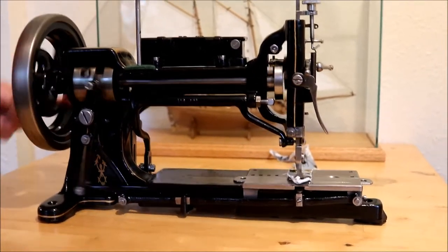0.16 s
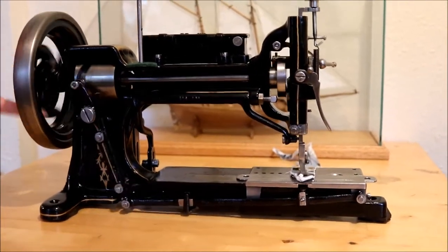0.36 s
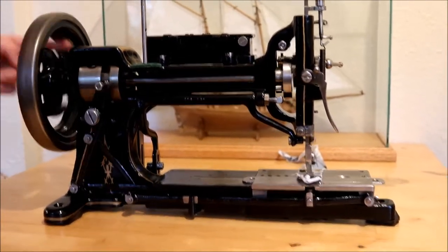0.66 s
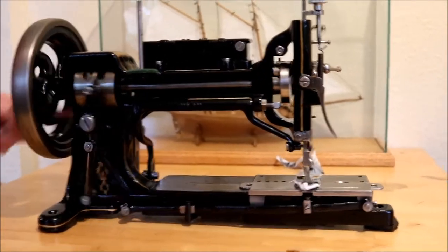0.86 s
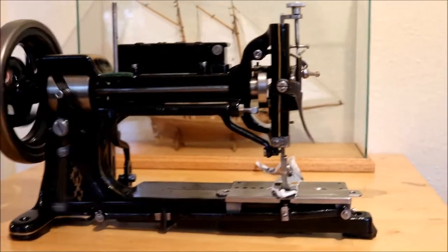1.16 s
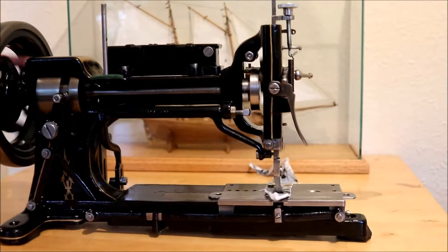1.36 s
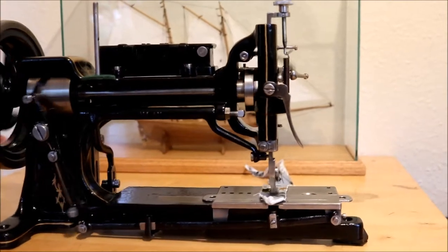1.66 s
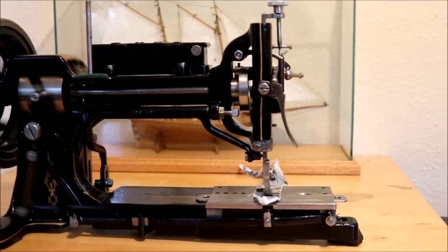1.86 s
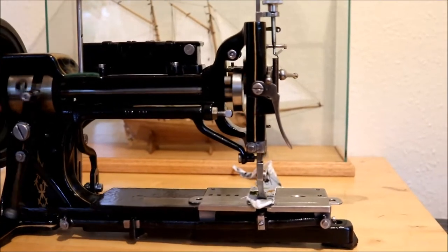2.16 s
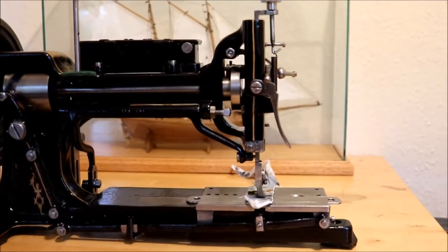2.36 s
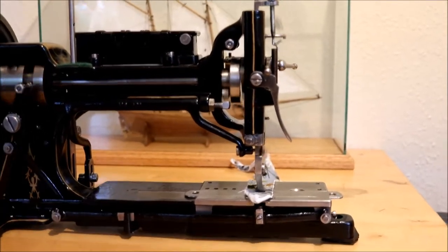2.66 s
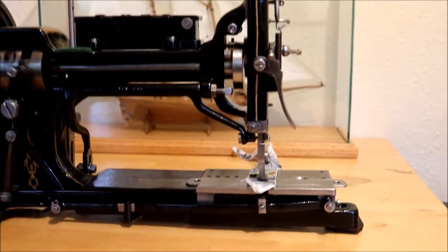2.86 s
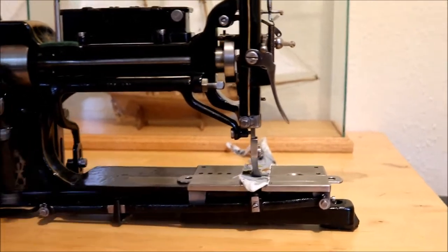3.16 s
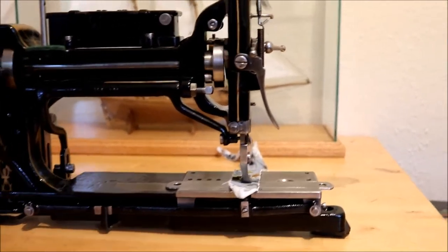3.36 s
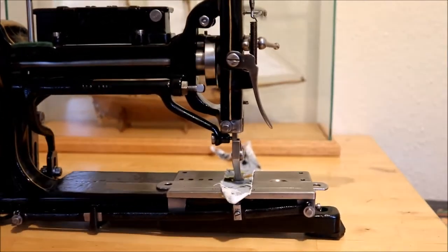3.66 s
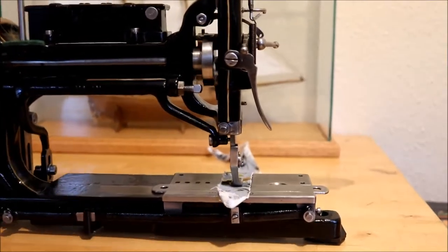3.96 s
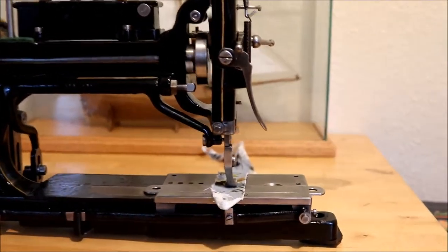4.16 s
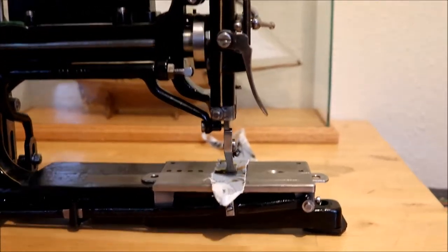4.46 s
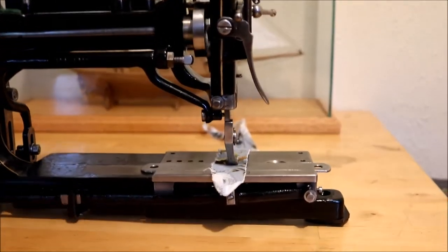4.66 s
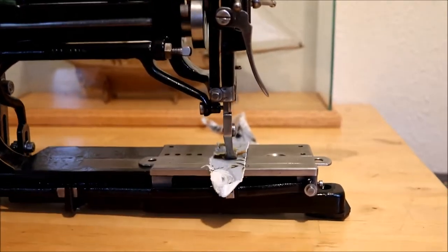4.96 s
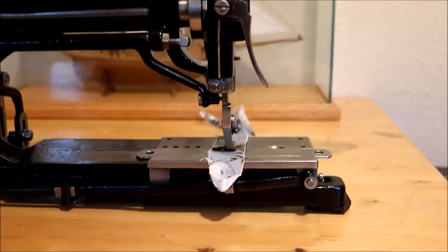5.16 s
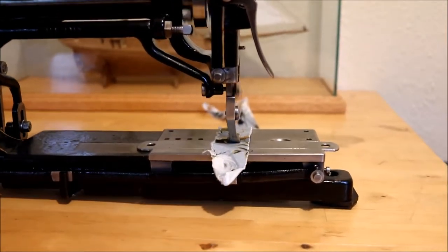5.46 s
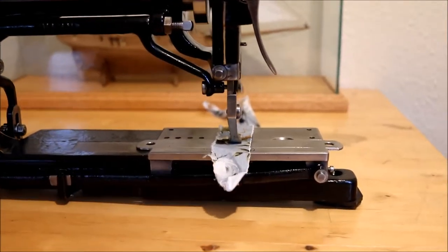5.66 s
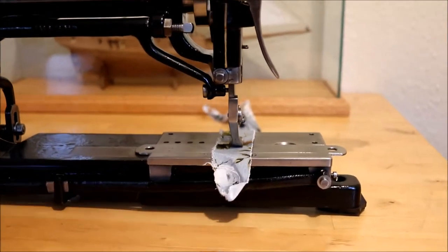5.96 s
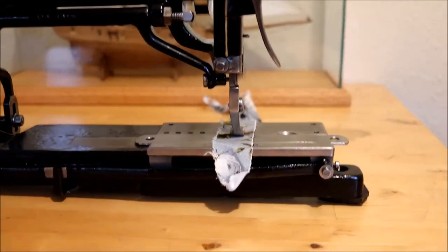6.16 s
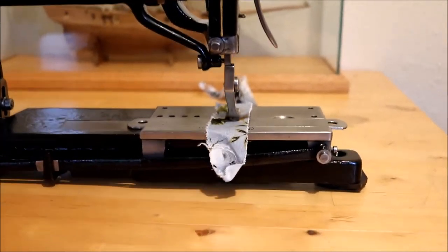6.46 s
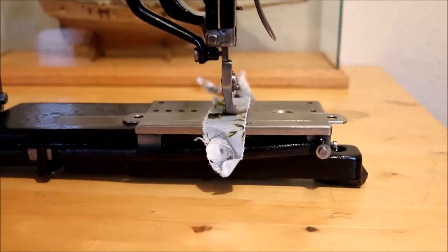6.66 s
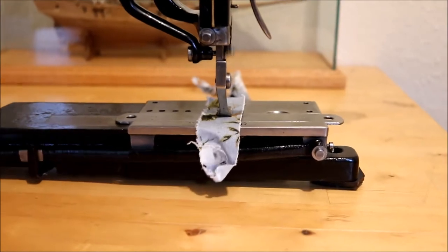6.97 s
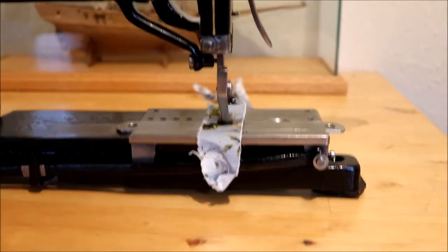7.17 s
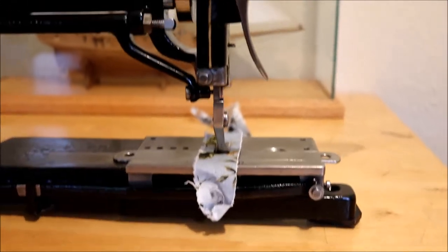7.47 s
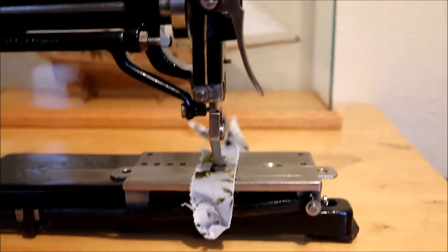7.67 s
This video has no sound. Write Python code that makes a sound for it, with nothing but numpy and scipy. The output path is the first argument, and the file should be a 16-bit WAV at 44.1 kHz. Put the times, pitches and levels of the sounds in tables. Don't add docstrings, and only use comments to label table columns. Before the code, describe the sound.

Hand-turned antique sewing machine clatters evenly on a wooden table, each turn a click, ping, double clack and hard clack over low rumble.

```python
import sys
import numpy as np
from scipy import signal
from scipy.fft import rfft, irfft
from scipy.io import wavfile
from scipy.ndimage import uniform_filter1d, map_coordinates

SR = 44100
rng = np.random.default_rng(int(sys.argv[2]) if len(sys.argv) > 2 else 0)


def pcm_store(signal):
    levels = np.round(np.clip(np.atleast_2d(signal), -1, 1) * 32767)
    wavfile.write(sys.argv[1], SR, levels.astype(np.int16).T)


def level_to_linear(level):
    exponent = np.asarray(level, float) / 20
    return 10 ** exponent


N = 343980

# (lever [s], spring [s], latch [s], feed [s], shuttle [s])
TURNS = [(0.0764, 0.1354, 0.279, 0.2918, 0.4484), (0.7651, 0.8233, 0.9594, 0.9726, 1.1242),
         (1.4388, 1.474, 1.6107, 1.6222, 1.7753), (2.0838, 2.141, 2.2758, 2.2886, 2.4413),
         (2.7577, 2.817, 2.9562, 2.9685, 3.1281), (3.462, 3.5222, 3.6711, 3.6814, 3.8537),
         (4.1982, 4.258, 4.4045, 4.4186, 4.5744), (4.8957, 4.9516, 5.089, 5.1017, 5.2489),
         (5.5572, 5.6126, 5.7483, 5.7604, 5.912), (6.2244, 6.2785, 6.4157, 6.4275, 6.5779),
         (6.8831, 6.9362, 7.069, 7.0799, 7.2258), (7.5235, 7.5757, 7.7025, 7.7129, 7.858)]
# (time [s], level [dB])
HAND = [(0, -1), (.6, 1), (1.2, -0.5), (1.8, 0.5), (2.4, 0.5), (3, 0.5), (3.5, 0), (4.1, -0.5), (4.6, 2.5),
        (5.1, 2), (5.6, 4), (6.2, 3.5), (6.7, 2.5), (7.2, 5), (7.8, 3.5)]
# (frequency [Hz], width [Hz], level [dB])
CASTING = [(469, 22, -4.5), (683.4, 79, 1.5), (824.3, 43, 4), (893, 50, -1), (1296, 165, -8.5)]
# (frequency [Hz], level [dB per Hz])
FRAME = [(530, -1.5), (900, -18), (968, -1.5), (1610, -4.5), (2590, 0), (3150, -4), (4330, -2),
         (6310, -7.5), (13700, -13), (15500, -13.5), (16500, -49)]


def unit(x):
    return x / np.sqrt(np.mean(x ** 2))


def colour(x, points, share=0.91):
    hz, db = np.transpose(points)
    f = np.maximum(np.arange(N // 2 + 1) * SR / N, 1)
    gain_db = share * np.interp(np.log(f), np.log(hz), db)
    return irfft(rfft(x) * level_to_linear(gain_db), N)


def mode(x, hz, t60):
    r, w = np.exp(-np.log(1000) / (t60 * SR)), 2 * np.pi * hz / SR
    return signal.lfilter([0, np.sin(w)], [1, -2 * r * np.cos(w), r * r], x)


def ring(x, peaks):
    total = 0
    for k, (hz, width, db) in enumerate(peaks):
        t60 = np.log(1000) / np.pi / width
        total = total + (-1) ** k * level_to_linear(db) * width / 1000 * mode(x, hz, t60)
    return total


def fade(bare, t60):
    return signal.lfilter([1], [1, -np.exp(-np.log(1000) / (t60 * SR))], bare)


def stereo_noise(alike_hz):
    mid, side = rng.standard_normal((2, N))
    side = signal.lfilter(*signal.butter(1, alike_hz, "high", fs=SR), side)
    return np.array([mid + side, mid - side])


def grainy(x, grain_db, size):
    jumps = np.minimum(rng.exponential(size=N // size + 1), 3)
    return x * level_to_linear(grain_db * np.repeat(jumps, size)[:N])


def even(force):
    spectrum = rfft(force)
    size = abs(spectrum)
    return irfft(spectrum * (size.mean() / (size + 1e-9)) ** .75, len(force))


def blows(table, peaks, rise_ms, chatter_ms, vary, crack=0.):
    burst, length = 600, 3000
    ms = np.arange(burst) * 1000 / SR
    shape = (1 - np.exp(-ms / rise_ms)) * np.exp(-ms / chatter_ms)
    onset = np.minimum(shape / shape.max() * 8, 1)
    habit, change = rng.laplace(size=burst), rng.laplace(size=(len(table), burst))
    usual_peak = abs(ring(even(shape * habit), peaks)).max() * np.hypot(1, vary)
    sound, bare = np.zeros((2, N + length)), np.zeros(N)
    for (time, db, left_db), fresh in zip(table, change):
        force = even(shape * (habit + vary * fresh)) * onset
        force = np.r_[force, np.zeros(length - burst)]
        hit = ring(force, peaks) / usual_peak + crack * np.diff(force, prepend=0)
        i = int(time * SR)
        sound[:, i:i + length] += hit * level_to_linear(db + np.array([[left_db], [-left_db]]) / 2)
        bare[i] = level_to_linear(db)
    return sound[:, :N], bare


def side_blows(table, late_s, db):
    return [(row[0] + late_s, row[1] + db, row[2]) for row in table]


def light(sound):
    return signal.sosfilt(signal.butter(2, 2260, "high", fs=SR, output="sos"), sound)


def turn_marks():
    return np.array(TURNS)[:, [0, 2, 4]].ravel()


def place_time(place):
    marks = turn_marks()
    return np.interp(place + 3 * np.arange(len(TURNS)), np.arange(len(marks)), marks, right=N)


def part_rows(times, part, extra_db=0, stray=()):
    db, nearer, pan, turning, share = part
    peak = db + nearer * times + share * np.interp(times, *np.transpose(HAND)) + extra_db
    heard = [row for row in zip(times, peak, pan + turning * times) if row[0] < N / SR]
    return sorted(heard + list(stray))


def turn_blows():
    firm_db = [-1.5, .3, 0, .5, .5, -0.5, -0.2, .5, 0, -0.1, -0.5, -1.5]
    # (lead before latch [ms], peak there [dB], peak after shuttle [dB])
    play = [(33.6, -52.5, -21), (31, -33, -21.5), (32.4, -38, -27), (32.4, -46, -21.5), (33.2, -28.5, -25),
            (36.4, -45, -23), (34.8, -45, -22), (29.7, -22.5, -22), (31.4, -40, -24), (31.3, -33, -40),
            (27.5, -25.5, -20), (26.3, -35, -25)]
    # (time [s], peak [dB], left minus right [dB])
    stray_slack = [
        (5.8107, -40, -2.5),
        (6.1384, -35, 0),
        (6.699, -38, -7),
        (7.447, -26, 7),
    ]
    # (time [s], peak [dB], left minus right [dB])
    stray_thread = [
        (1.5993, -38, -2),
        (3.559, -51, 0),
        (4.973, -44, 0),
        (5.8122, -40, 1.5),
        (6.1374, -42, 7),
        (6.7768, -34.5, 11),
        (7.142, -46, -1),
        (7.1711, -40, 4),
    ]
    # (peak [dB], gain [dB/s], left minus right [dB], turning [dB/s], share of hand effort)
    lever, spring, latch = (-11.5, 0.21, -2.5, 0.35, 0.36), (-23, 0.04, -1.5, 2.2, -0.1), (-9.5, 0.35, -4, 0.6, 0.12)
    feed, shuttle = (-11.5, 0.26, -5, 1.1, -0.6), (-4, 0.02, -3, 0.5, 0.34)
    slack_early, slack_late = (0, -0.047, -1.5, .15, 0), (-4, 0, -7, 1.8, -0.5)
    pull, lift, settle = (-39.5, -0.33, -1.5, 1, 2), (-61, -0.5, -.5, 1.5, 4), (-55, 1, -.5, 2.7, -0.5)
    quick_db = 1.2, 2.7, 0.79, 0.34, 0.52

    times = np.transpose(TURNS)
    quick = 10 * (0.65 / np.gradient(times[0]) - 1)
    main = [part_rows(s, part, db * quick + firm_db)
            for s, part, db in zip(times, (lever, spring, latch, feed, shuttle), quick_db)]
    lead_ms, early_db, late_db = np.transpose(play)
    late = part_rows(place_time(2.613), slack_late, late_db, stray_slack)
    slack = part_rows(times[2] - lead_ms / 1000, slack_early, early_db, late)
    setting = part_rows(place_time(2.66), settle, stray=stray_thread)
    thread = part_rows(place_time(1.49), pull, stray=setting)
    thread += part_rows(place_time(2.555), lift)
    return main + [slack, thread]


def cam_loads(t):
    # (place in turn, half width [places], table rumble [dB], gear grind [dB], scrape [dB])
    cams = [
        (.28, 0.18, -29.5, -45, -61),
        (.6, .15, -35.5, -51, -60.5),
        (0.901, 0.067, -25.5, -46.5, -50),
        (1.32, 0.15, -22, -37, -51),
        (1.55, 0.16, -22, -37.5, -43),
        (1.86, 0.084, -20.5, -63, -60),
        (2.1, 0.22, -28, -43.5, -60),
        (2.662, 0.15, -29, -47.5, -55.5),
    ]
    idle_db = -38, -49.5, -50
    marks = turn_marks()
    place = np.interp(t, np.r_[-.24, marks], np.arange(-1, len(marks))) % 3
    gain = level_to_linear(idle_db)[:, None]
    for at, width, *db in cams:
        gain = gain + level_to_linear(db)[:, None] * np.exp(-((place - at) / width) ** 2)
    return 20 * np.log10(gain)


def table_top(rumble_db):
    # (frequency [Hz], t60 [s], share of feed blow, share of shuttle blow, share of rumble)
    wood_modes = [(104, .22, -.11, -.19, .22), (122, .25, -.03, .06, .1), (138, .27, .33, .02, .45),
                  (156, .22, -.15, .15, 1.), (231, .11, -.15, .045, .17), (243, .13, .16, .01, .12),
                  (303, .1, .01, -.11, .22), (328, .15, .01, -.03, .15), (387, .3, .01, .005, .06),
                  (505, .17, .014, .005, .05), (690, .1, .02, .01, .05), (815, .12, .02, -.04, .06)]
    latch_s, shuttle_s = np.transpose(TURNS)[2::2]
    feed, shuttle = np.zeros((2, N))
    for train, times, lag_s, db in ((feed, latch_s, .0223, 4.5), (shuttle, shuttle_s, .0091, .1)):
        train[((times[times < N / SR] + lag_s) * SR).astype(int)] = level_to_linear(db)
    shake = level_to_linear(rumble_db - 36) * rng.standard_normal(N)
    wood = sum(mode(a * feed + b * shuttle + c * shake, hz, t60) for hz, t60, a, b, c in wood_modes)
    return wood * level_to_linear([[.4], [-.4]])


def friction(db, peaks, alike_hz, patchy_db):
    patches = np.repeat(rng.standard_normal(N // 1500 + 1), 1500)[:N]
    patches = uniform_filter1d(patches, size=1500)
    rub = grainy(stereo_noise(alike_hz), grain_db=3.5, size=200)
    return level_to_linear(db + patchy_db * patches) * unit(ring(rub, peaks))


def gear_grind(grind_db, effort_db):
    return friction(grind_db + 0.14 * effort_db, CASTING, alike_hz=2650, patchy_db=1.0)


def plate_scrape(scrape_db, effort_db):
    # (frequency [Hz], width [Hz], level [dB])
    plates = [(1449, 77, 6), (1892, 94, 5), (2225, 130, 2), (2900, 250, -3), (4600, 760, -12)]
    return friction(scrape_db + 0.44 * effort_db, plates, alike_hz=2680, patchy_db=1.5)


def room_air():
    # (frequency [Hz], level [dB per Hz])
    air_colour = [(20, -6), (60, 6), (300, -1), (1000, -32), (2500, -20.5), (4000, -26), (9000, -32.5),
                  (15000, -45), (17000, -50)]
    return level_to_linear(-45.5) * unit(colour(stereo_noise(500), air_colour))


def slack_joints(slacks, levers, feeds, shuttles):
    # (frequency [Hz], width [Hz], level [dB])
    slack_ring = [(1440, 270, 9.5), (1960, 180, 11.5), (2650, 660, 5.5), (4580, 4400, -13.5)]
    knocks = slacks + side_blows(levers, 0.015, db=-22) + side_blows(levers, -0.0052, db=-23)
    knocks += side_blows(shuttles, 0.031, db=-27.5) + side_blows(feeds, .025, db=-14.0)
    knocks += side_blows(shuttles, 0.076, db=-34.0)
    return blows(knocks, slack_ring, rise_ms=0.15, chatter_ms=1.4, vary=4.8)


def thread_ticks(threads, levers):
    # (frequency [Hz], width [Hz], level [dB])
    thread_ring = [(4500, 800, -2.5), (7000, 300, 5), (12300, 1300, -4.5)]
    ticks = threads + side_blows(levers, -0.00087, db=-28)
    return blows(ticks, thread_ring, rise_ms=.2, chatter_ms=0.67, vary=3.7, crack=0.062)


def take_up_lever(levers):
    # (frequency [Hz], width [Hz], level [dB])
    lever_ring = [(2945, 136, 7), (4063, 224, 7.5), (4497, 195, 5), (5690, 290, -3), (6400, 660, -6),
                  (8860, 430, -4.5), (10260, 370, -8.5), (12100, 1400, -10), (14500, 690, -2)]
    # (frequency [Hz], width [Hz], level [dB])
    lever_tail = [(2890, 30, -12), (4660, 60, -15), (14170, 150, -6)]
    sound, bare = blows(levers, lever_ring + lever_tail, rise_ms=3.5, chatter_ms=1.5, vary=0.3, crack=0.06)
    return light(sound), bare


def spring_ping(springs):
    # (frequency [Hz], width [Hz], level [dB])
    spring_ring = [(7380, 280, 13), (9730, 230, 6.5), (11100, 250, 1), (11400, 250, -7), (13200, 1100, -3)]
    # (frequency [Hz], t60 [s], level under the blow [dB])
    spring_hum = [(7240, .07, -28), (7400, .06, -28), (7870, .05, -33)]
    snaps = springs + side_blows(springs, 0.0068, db=-10)
    sound, bare = blows(snaps, spring_ring, rise_ms=0.25, chatter_ms=0.98, vary=1.0, crack=0.084)
    buzz = bare + 0.1 * fade(bare, 0.15) * grainy(rng.standard_normal(N), grain_db=4.0, size=300)
    hum = sum(level_to_linear(db) * mode(buzz, hz, t60) for hz, t60, db in spring_hum)
    return sound + hum * level_to_linear([[2.5], [-2.5]]), bare


def feed_latch(latches):
    # (frequency [Hz], width [Hz], level [dB])
    latch_ring = [(2920, 380, -11), (4075, 350, 4), (5950, 390, -6), (6700, 650, -22), (8760, 580, -12),
                  (10230, 590, -14.5), (11430, 830, -16.5), (13800, 970, -15)]
    sound, bare = blows(latches, latch_ring, rise_ms=0.076, chatter_ms=1.68, vary=0.9, crack=0.071)
    return light(sound), bare


def feed_drop(feeds):
    # (frequency [Hz], width [Hz], level [dB])
    feed_ring = [(790, 56, -34), (1630, 260, 3.5), (2920, 430, 6), (4450, 250, 6.5), (6160, 520, -2),
                 (7700, 810, -10), (9600, 330, -9), (11760, 680, -14), (14800, 540, -15)]
    drops = feeds + side_blows(feeds, 0.0058, db=-7.5)
    return blows(drops, feed_ring, rise_ms=0.2, chatter_ms=2.0, vary=0.45, crack=0.027)


def casting_knock(feeds, shuttles):
    knocks = side_blows(feeds, 0.00292, db=-12) + side_blows(shuttles, 0.00299, db=-18.0)
    return blows(knocks, CASTING, rise_ms=1.0, chatter_ms=1.03, vary=1.0)[0]


def shuttle_clack(shuttles):
    # (frequency [Hz], width [Hz], level [dB])
    shuttle_ring = [(800, 87, 8.5), (2200, 230, 2.5), (3380, 120, 4.5), (4160, 146, 9), (5520, 1060, 0.5),
                    (6800, 2300, -6), (9290, 850, 0.5), (10280, 750, -2.5), (12200, 1200, -9.5),
                    (14200, 760, -5)]
    clacks = shuttles + side_blows(shuttles, 0.0027, db=-22)
    return blows(clacks, shuttle_ring, rise_ms=0.052, chatter_ms=0.67, vary=0.29, crack=0.073)


def frame_rattle(impulses):
    share_db = -19.5, -14.5, -16.5, -18.0, -17.0, -23.0, -17
    drive = sum(level_to_linear(db) * bare for db, bare in zip(share_db, impulses))
    rise_t60 = 1.64e-3 * np.log(1000)
    grains = unit(colour(grainy(stereo_noise(2500), grain_db=3.5, size=40), FRAME))
    return (fade(drive, 0.056) - fade(drive, rise_t60)) * grains


def room_tail(impulses):
    share_db = -21.5, -30.5, -23, -24.5, -23.0, -63, -14
    drive = sum(level_to_linear(db) * bare for db, bare in zip(share_db, impulses))
    return fade(drive, 0.25) * unit(colour(stereo_noise(1000), FRAME, share=1.13))


def works():
    levers, springs, latches, feeds, shuttles, slacks, threads = turn_blows()
    parts = [take_up_lever(levers), feed_latch(latches), feed_drop(feeds), shuttle_clack(shuttles),
             spring_ping(springs), slack_joints(slacks, levers, feeds, shuttles), thread_ticks(threads, levers)]
    impulses = [bare for _, bare in parts]
    clicks = sum(sound for sound, _ in parts) + casting_knock(feeds, shuttles) + frame_rattle(impulses)
    sheen = signal.lfilter(*signal.butter(1, 7240, "high", fs=SR), clicks)
    sheen_db = 1 + .5 * np.arange(N) / SR
    return clicks + (level_to_linear(sheen_db) - 1) * sheen + room_tail(impulses)


def scene():
    t = np.arange(N) / SR
    effort_db = np.interp(t, *np.transpose(HAND))
    rumble_db, grind_db, scrape_db = cam_loads(t)
    wood = table_top(rumble_db + 4 + effort_db)
    iron = gear_grind(grind_db, effort_db) + plate_scrape(scrape_db, effort_db)
    return works() + wood + iron + room_air()


def low_pass(x):
    return signal.sosfilt(signal.butter(12, 16810, fs=SR, output="sos"), x)


def record(dry):
    # (frequency [Hz], left minus right [dB])
    port_balance = [(20, 0.5), (400, 0.3), (900, 1), (2400, -2), (4400, -0.5), (8000, 0), (15000, -5)]
    # (frequency [Hz], lead of the right port [radians])
    port_lead = [(3000, 0), (4200, -.3), (5800, .1), (7500, 1), (15000, 1.1)]
    # (time [s], lag of the right port [samples])
    port_lag = [(1, 0), (3, .75), (5, 1.15), (7.8, 1.15)]
    # (frequency [Hz], level [dB])
    mic_response = [(20, -19), (60, -25), (90, -6), (130, -1), (15300, 0), (16300, -12)]
    left = colour(dry[0], port_balance, share=0.57)
    right = colour(dry[1], port_balance, share=-0.48)
    lead = np.interp(np.arange(N // 2 + 1) * SR / N, *np.transpose(port_lead))
    right = irfft(rfft(right) * np.exp(1j * lead), N)
    lag = np.interp(np.arange(N) / SR, *np.transpose(port_lag))
    right = map_coordinates(right, [np.arange(N) - lag], order=5, mode="mirror")
    ports = colour(np.array([left, right]), mic_response)
    ports = np.tanh(.88 * ports) / .88
    ports = signal.sosfilt(signal.ellip(10, .2, 90, 16300, fs=SR, output="sos"), ports)
    return low_pass(ports)


dry = scene()
out = record(dry)
pcm_store(out)
```